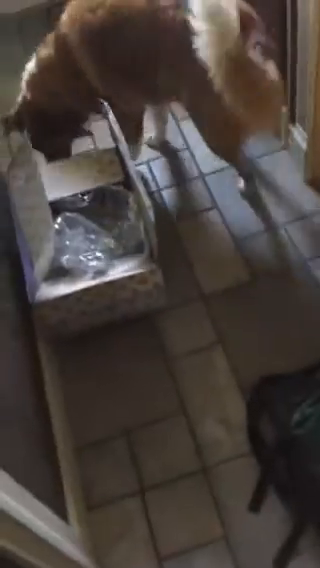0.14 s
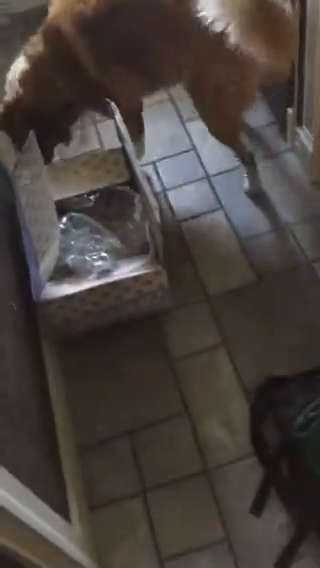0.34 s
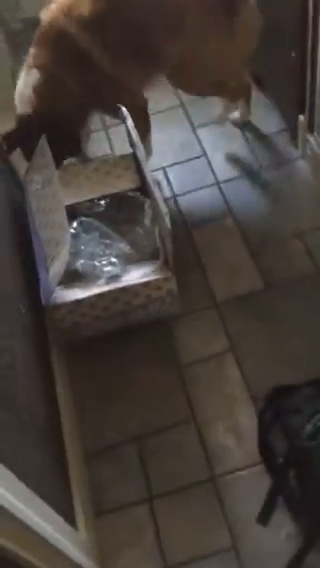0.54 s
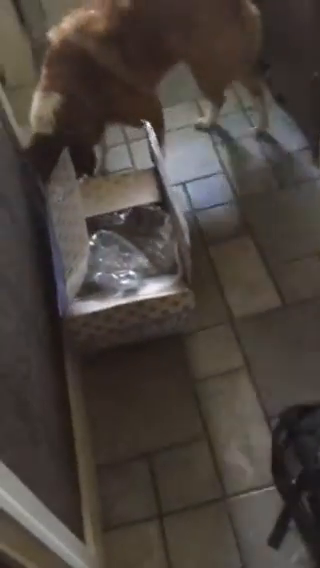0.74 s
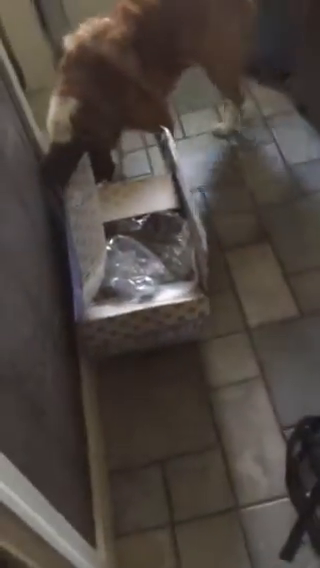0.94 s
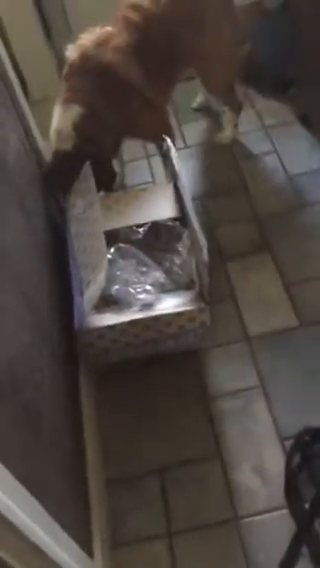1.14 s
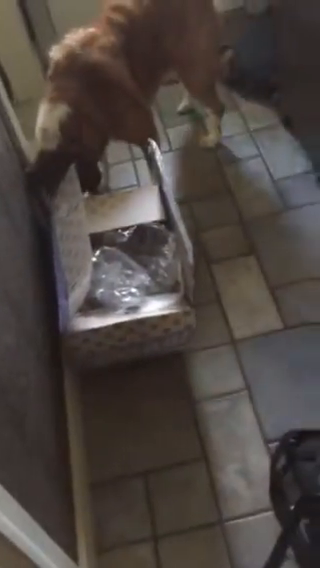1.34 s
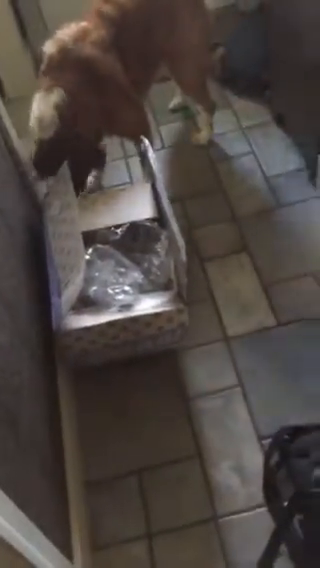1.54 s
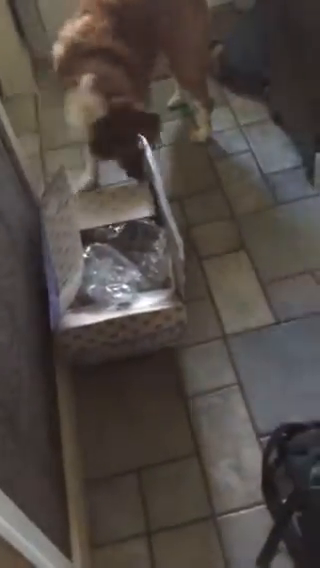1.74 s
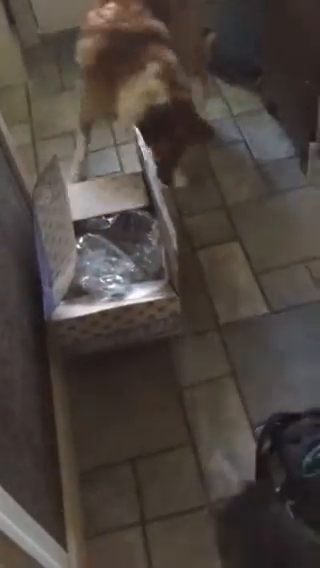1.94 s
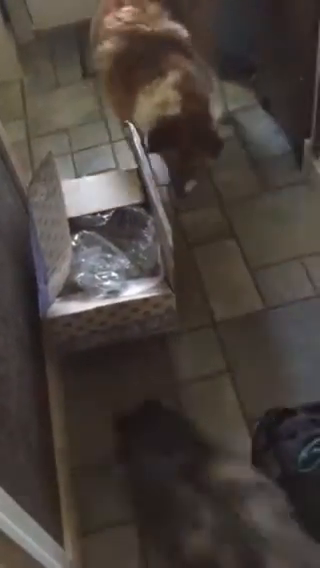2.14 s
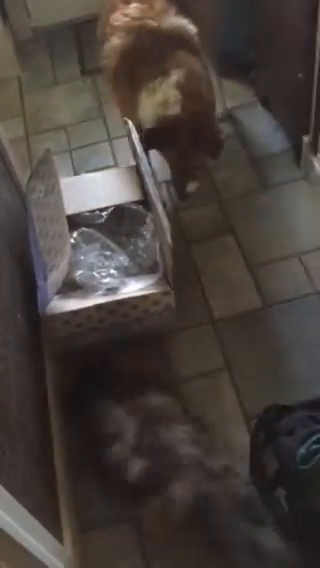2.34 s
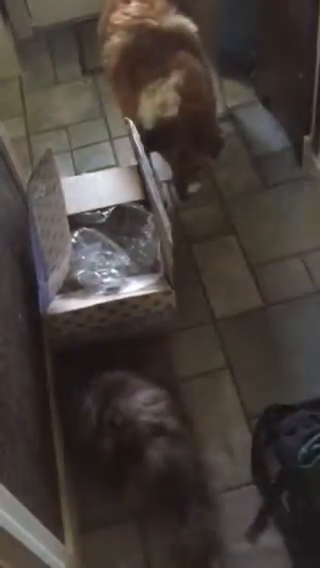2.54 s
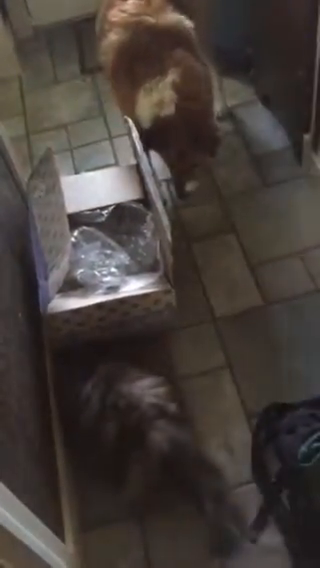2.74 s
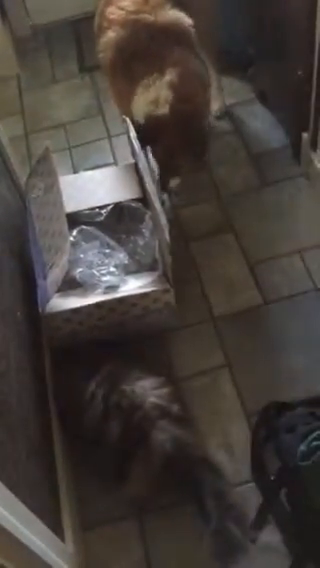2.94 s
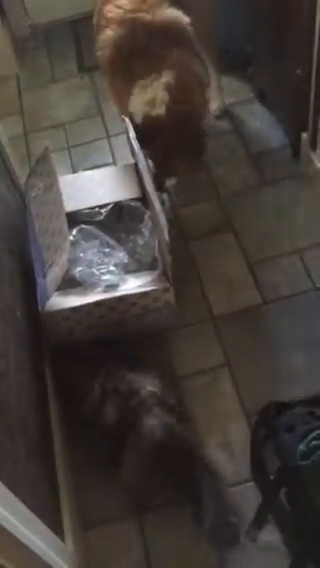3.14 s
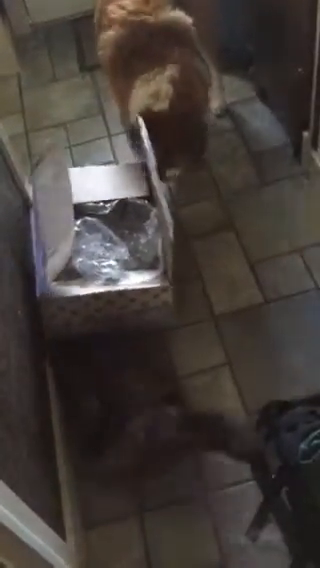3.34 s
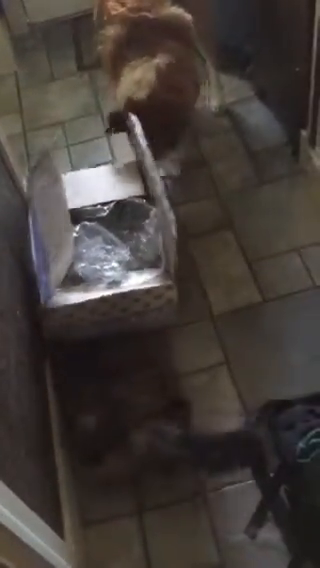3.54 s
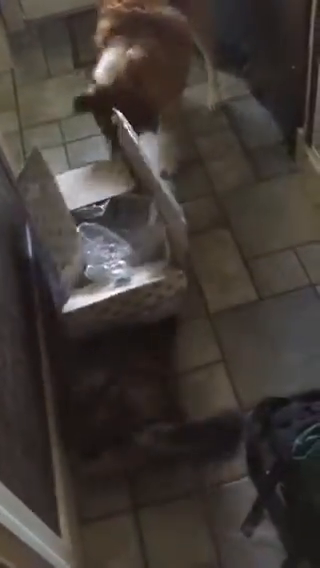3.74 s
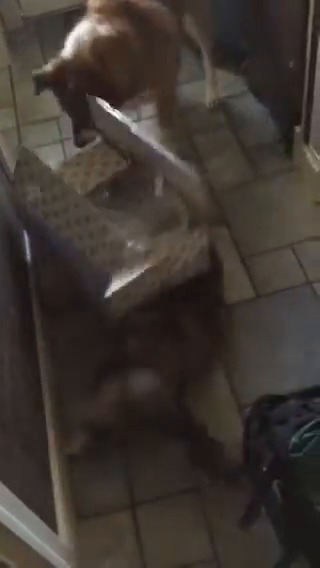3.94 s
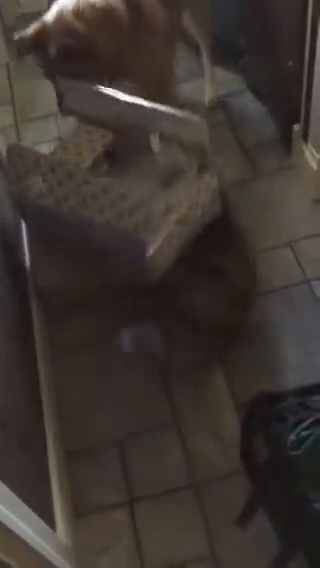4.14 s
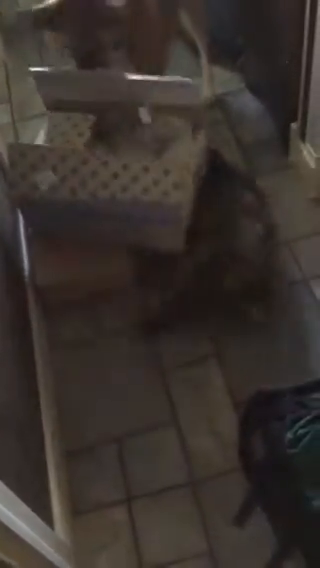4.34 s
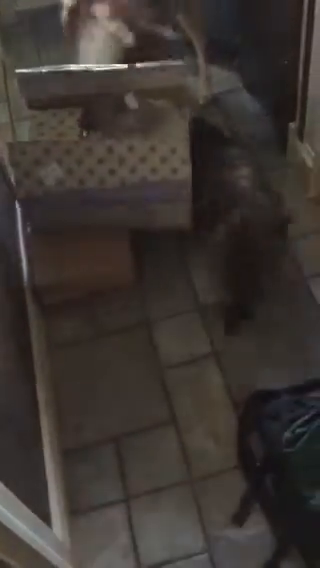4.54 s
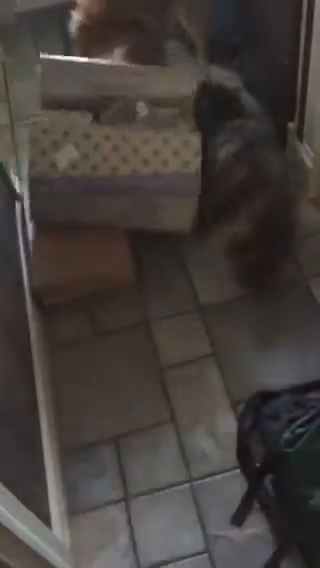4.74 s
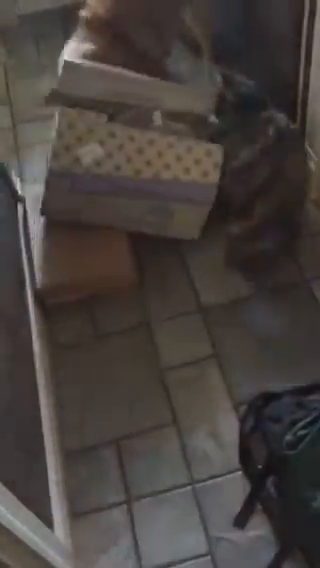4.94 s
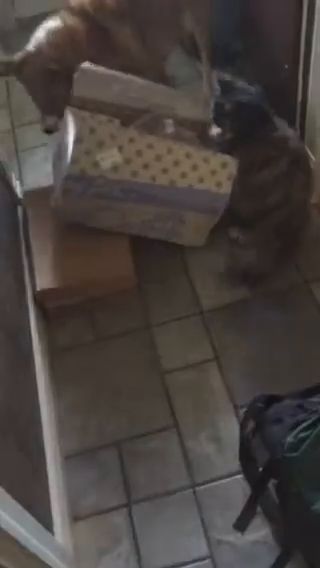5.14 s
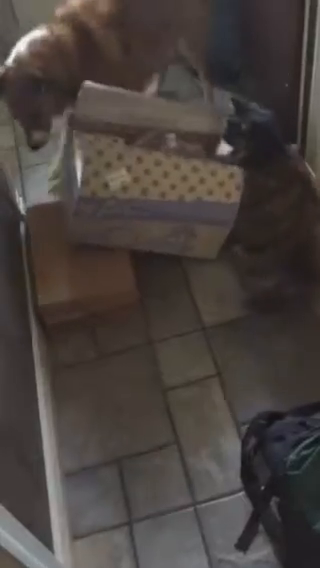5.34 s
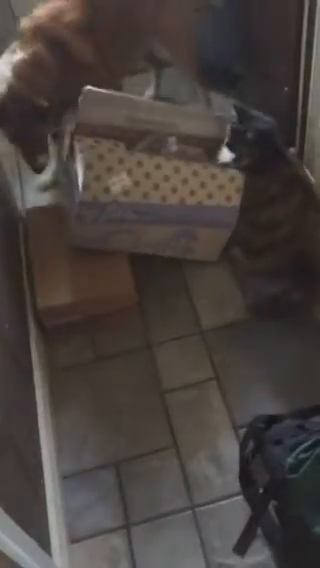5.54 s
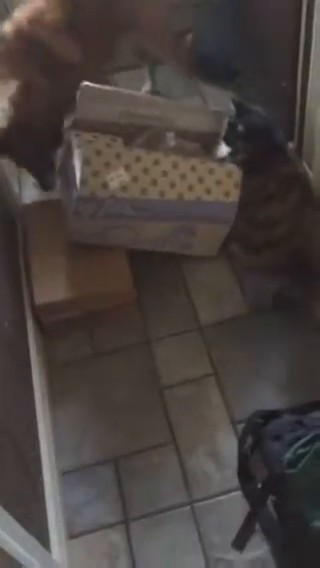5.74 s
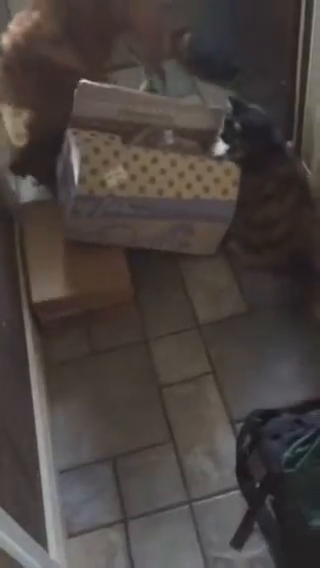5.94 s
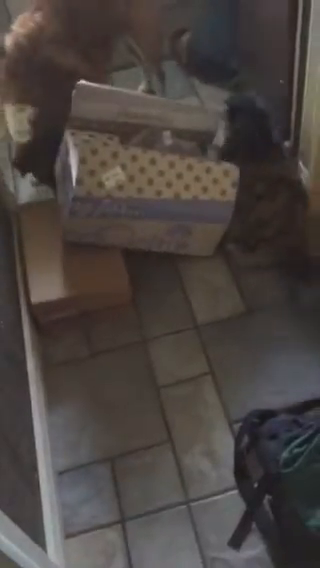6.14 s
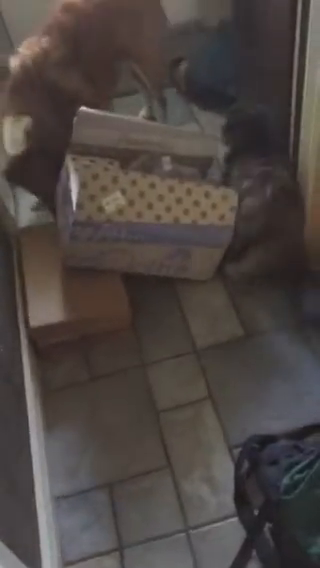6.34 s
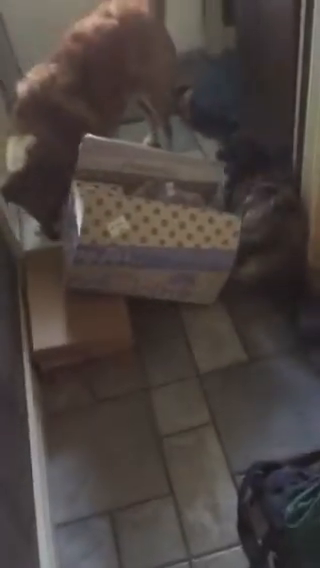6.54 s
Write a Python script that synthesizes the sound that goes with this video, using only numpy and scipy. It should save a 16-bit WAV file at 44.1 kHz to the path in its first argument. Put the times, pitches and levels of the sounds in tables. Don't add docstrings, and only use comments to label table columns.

```python
import sys
import numpy as np
from scipy import signal
from scipy.fft import rfft, irfft
from scipy.io import wavfile
from scipy.ndimage import uniform_filter1d

SR = 44100
rng = np.random.default_rng(int(sys.argv[2]) if len(sys.argv) > 2 else 0)


def boost_factor(decibels):
    exponent = np.asarray(decibels, float) / 20
    return 10 ** exponent


def store_pcm(level_fs):
    pcm = np.round(np.clip(level_fs, -1, 1) * 32767).astype(np.int16)
    wavfile.write(sys.argv[1], SR, np.atleast_2d(pcm).T)


N = 291035


def band(x, hz, width_hz):
    return signal.lfilter(*signal.iirpeak(hz, hz / width_hz, fs=SR), x)


def body(x, peaks):
    return sum((-1) ** k * boost_factor(db) * band(x, hz, width_hz) for k, (hz, width_hz, db) in enumerate(peaks))


def scaled(x, peak=False):
    return x / (np.abs(x).max() if peak else np.sqrt(np.mean(x ** 2)))


def steep(x, hz, width_hz):
    return scaled(band(band(x, hz, width_hz), hz, width_hz), peak=True)


def highpass(x, hz):
    return signal.sosfilt(signal.butter(2, hz, "high", fs=SR, output="sos"), x)


def add(out, x, start_s):
    i = max(int(start_s * SR), 0)
    out[i:i + len(x)] += x[:N - i]


def walk(rate_hz):
    hold = int(SR / rate_hz)
    steps = np.repeat(rng.standard_normal(N // hold + 1), hold)
    return scaled(uniform_filter1d(uniform_filter1d(steps, hold), hold)[:N])


def ring(t, hz, t60_s):
    return np.sin(2 * np.pi * hz * t) * 1000. ** (-t / t60_s)


def grains(size, rate_hz, scatter_db):
    when, size_draw, side = rng.random((3, size))
    strength = boost_factor(-scatter_db * np.log(size_draw + 0.003))
    return (when < rate_hz / SR) * strength * np.sign(side - .5)


def crumble(t, length_s, rate_hz):
    force = grains(len(t), rate_hz, 3.12) * np.exp(-t / length_s) * np.minimum(t / 0.0014, 1)
    force[SR // 1000] = 2.
    return force


# hz [Hz], level_db [dB per Hz]
AIR_SPECTRUM = [(12, -54), (20, -51), (37, -9.5), (76, -8.5), (112, -2), (133, -10), (153, -13.5),
                (282, -15.5), (404, -20), (452, -28.5), (491, -26), (767, -27.5), (906, -28.5), (1920, -32),
                (15500, -49)]
# hz [Hz], level_db [dB]
FRIDGE_HUM = [(119, -65.5), (280, -81), (356, -80), (1217, -85.5)]


def air():
    hz, db = np.transpose(AIR_SPECTRUM)
    f = np.maximum(np.arange(N // 2 + 1) * SR / N, 1)
    colour = rfft(rng.standard_normal(N)) * boost_factor(np.interp(np.log(f), np.log(hz), db))
    low, whole = irfft(colour * (f < 450), N), irfft(colour, N)
    rumble = boost_factor(-1 + 2.62 * walk(3.25)) * low
    hiss = boost_factor(2 + 0.64 * walk(1.2)) * (whole - low)
    drift_s = np.cumsum(1 + .008 * walk(2)) / SR
    hum = sum(boost_factor(level_db + 2.0 + 2.35 * walk(9.9)) * np.sin(2 * np.pi * partial_hz * drift_s)
              for partial_hz, level_db in FRIDGE_HUM)
    return boost_factor(-60.5) * scaled(rumble + hiss) + hum


# hz [Hz], t60_s [s]
ROOM_DECAY = [(200, 0.84), (1000, 0.3), (4000, 0.14), (12000, 0.18)]


def room(x):
    early_s, late_db = 0.028, 0.5
    t = np.arange(SR // 2) / SR
    echo = 0
    for hz, t60_s in ROOM_DECAY:
        noise = scaled(band(rng.standard_normal(len(t)), hz, 1.8 * hz))
        echo = echo + noise * np.sqrt(hz / t60_s) * 1000. ** (-t / t60_s)
    onset = np.clip(t / 0.00058 - .5, 0, 1)
    late = boost_factor(late_db * np.clip((t - early_s) / 0.0046, 0, 1))
    echo = echo * onset * late
    return signal.fftconvolve(x, echo / np.sqrt(np.sum(echo ** 2)))[:N]


# start_s [s], peak_db [dB]
TAG_CHINKS = [
    (0.018, -57),
    (2.095, -62),
    (2.583, -62.5),
    (2.612, -65),
    (3.576, -59),
    (3.605, -53),
    (5.9293, -55.5),
]
# hz [Hz], level_db [dB], t60_s [s]
TAG_MODES = [(9830, 0, 0.018), (10340, 6.5, 0.029), (11300, -7, 0.019), (8400, -6, .02), (6060, -4, 0.02),
             (6500, 0, 0.026), (14000, -6, 0.022)]


def tags():
    out, t = np.zeros(N), np.arange(SR // 5) / SR
    modes = sum(boost_factor(level_db) * ring(t, hz, t60_s) for hz, level_db, t60_s in TAG_MODES)
    for start_s, peak_db in TAG_CHINKS:
        chink = signal.fftconvolve(crumble(t, 0.019, 820), modes)[:len(t)]
        add(out, boost_factor(peak_db) * scaled(chink, peak=True), start_s)
    return out


def contact(force, db, hz, tick_db, grit_db, grit_hz=8500):
    spread = np.clip(0.65 + 0.054 * (db + 51.5), .2, 1.5)
    claw = steep(force, hz, 0.9 * hz) + spread * steep(force, 2400, 4500)
    tick = boost_factor(tick_db) * steep(force, 5870, 5400)
    grit = boost_factor(grit_db) * scaled(highpass(force, grit_hz), peak=True)
    return boost_factor(db) * (claw + tick + grit)


def tap(out, start_s, peak_db, ring_hz, tick_db, grit_db, grit_hz, crumble_s):
    length_s = crumble_s * np.exp(-0.0144 * (peak_db + 41.5))
    force = crumble(np.arange(SR // 4) / SR, length_s, 12000)
    add(out, boost_factor(-7.5) * contact(force, peak_db, ring_hz, tick_db, grit_db, grit_hz), start_s - .001)


def scuffs(rows, hz, grit_db):
    out, t = np.zeros(N), np.arange(SR // 4) / SR
    for start_s, peak_db, bright_db, slide_s in rows:
        swell = np.sin(np.pi * np.minimum(t / slide_s, 1) ** 0.76) ** 2
        force = grains(len(t), 14000, 1.46) * swell
        add(out, boost_factor(-4.5) * contact(force, peak_db, hz, bright_db, bright_db + grit_db), start_s - .004)
    return out


# start_s [s], peak_db [dB], ring_hz [Hz], tick_db [dB]
CLAW_TAPS = [(0.0428, -53.5, 2050, -21), (0.1071, -40, 3450, 5), (0.4972, -50.5, 2880, -21),
             (0.5608, -58, 1950, 7.5), (0.841, -49, 2240, 9.5), (1.1617, -48.5, 2100, -7),
             (1.372, -49.5, 1660, -29), (1.914, -33, 3800, -5), (2.0217, -49.5, 4040, -6),
             (2.055, -48, 2150, 4), (3.417, -45.5, 2360, -7), (3.7409, -44.5, 1940, -1),
             (4.2727, -49.5, 1770, -8), (4.4548, -29, 1420, 0.5), (4.5808, -38, 2200, 4),
             (4.8285, -42, 2060, -19), (4.8954, -37.5, 2150, 8.5), (5.009, -46, 1670, -7),
             (5.2744, -44, 2040, -12), (5.3081, -33.5, 2720, -12), (5.9965, -53, 2880, 0)]


def claw_taps():
    out = np.zeros(N)
    for start_s, peak_db, ring_hz, tick_db in CLAW_TAPS:
        tap(out, start_s, peak_db, ring_hz, tick_db, grit_db=-21, grit_hz=8400, crumble_s=0.016)
    return out


# start_s [s], peak_db [dB], bright_db [dB], slide_s [s]
PAW_SLIDES = [(0.0004, -52, 7, 0.012), (0.2694, -63, -3, 0.042), (0.3794, -66.5, 1, 0.048),
              (0.5044, -52.5, -14, 0.036), (0.8194, -45.5, -30, 0.066), (0.8994, -69, 3, 0.05),
              (1.3459, -59, -16, 0.019), (1.6594, -73, -2, 0.045), (1.7794, -55.5, -0.5, 0.038),
              (2.3085, -59.5, 3.5, 0.053), (2.489, -68.5, 8, 0.05), (2.5144, -71, 6, 0.051),
              (2.5844, -73, -4, 0.045), (5.7528, -57, -16, 0.037), (5.7709, -54, -21, 0.044),
              (5.8394, -70, 8, 0.03)]


def paw_scuffs():
    return scuffs(PAW_SLIDES, hz=2200, grit_db=-16)


# start_s [s], peak_db [dB], bright_db [dB], slide_s [s]
WRAP_BRUSHES = [
    (3.4734, -59.5, -12, 0.081),
    (4.19, -56.5, -15, 0.045),
    (4.219, -61, -6, 0.043),
    (5.1406, -68, -12, 0.027),
    (5.4994, -63, -8, 0.052),
]


def wrap_scuffs():
    return scuffs(WRAP_BRUSHES, hz=1560, grit_db=17.5)


# start_s [s], peak_db [dB], ring_hz [Hz], grit_db [dB]
TAPE_SNAPS = [
    (0.0191, -49.5, 1960, 11),
    (0.7771, -45, 2520, 10.5),
    (3.3273, -30, 1410, -0.5),
    (4.8754, -35.5, 1480, 4),
    (5.1679, -35.5, 1472, 16),
]


def tape_snaps():
    out = np.zeros(N)
    for start_s, peak_db, ring_hz, grit_db in TAPE_SNAPS:
        tap(out, start_s, peak_db, ring_hz, -39, grit_db, grit_hz=7900, crumble_s=0.015)
    return out


# start_s [s], peak_db [dB], ring_hz [Hz], grit_db [dB]
CARD_SKIDS = [
    (2.2308, -35, 2120, 7.5),
    (3.6052, -53.5, 1470, -2),
    (3.8781, -36.5, 1870, 12.5),
    (3.9575, -43, 1620, -9),
    (4.3896, -45.5, 2170, 12),
    (4.7579, -31, 1630, 4.5),
    (5.1231, -45, 2380, 15.5),
]


def card_skids():
    out = np.zeros(N)
    for start_s, peak_db, ring_hz, grit_db in CARD_SKIDS:
        tap(out, start_s, peak_db, ring_hz, 1.5, grit_db, grit_hz=3800, crumble_s=.018)
    return out


# start_s [s], peak_db [dB], bright_db [dB], slide_s [s]
BASE_SLIDES = [(3.2935, -45, -9, 0.15), (3.6297, -53, -12, 0.063), (3.67, -54, -7, 0.014),
               (3.8206, -52, -10, 0.058), (3.9803, -45.5, 2, 0.08), (4.0594, -57.5, 7, 0.1),
               (4.1087, -53.5, -2, 0.039), (4.6206, -46, -8, 0.014), (4.7886, -44, -6, 0.072),
               (4.9097, -44, -13, 0.056), (4.951, -45.5, -18, 0.054), (5.2106, -53, -8, 0.07),
               (5.2494, -42.5, 7, 0.049), (5.31, -44.5, -14, 0.05), (5.3574, -53.5, -12, 0.055),
               (5.411, -50, -8, 0.036)]


def box_scuffs():
    return scuffs(BASE_SLIDES, hz=1680, grit_db=-3)


# start_s [s], peak_db [dB], loudest_hz [Hz], rattle_s [s]
EDGE_BLOWS = [(0.111, -60.5, 686, 0.018), (1.915, -48.5, 1120, 0.01), (2.232, -58, 1170, 0.0073),
              (3.326, -31.5, 816, 0.022), (3.349, -36.5, 604, 0.012), (3.389, -46, 890, 0.026),
              (3.439, -45.5, 840, 0.0083), (3.519, -54, 610, 0.0072), (3.605, -52, 993, 0.022),
              (3.677, -47, 1070, 0.005), (3.882, -68, 960, 0.015), (3.989, -43, 1050, 0.021),
              (4.454, -23, 992, 0.0058), (4.575, -44.5, 1136, 0.046), (4.713, -45.5, 1080, 0.021),
              (4.76, -25, 877, 0.0097), (4.865, -33, 1050, 0.012), (4.958, -36.5, 486, 0.024),
              (5.124, -45, 690, 0.015), (5.169, -25.5, 930, 0.0077), (5.53, -55, 1050, 0.0097)]
# hz [Hz], width_hz [Hz], level_db [dB]
EDGE_MODES = [(604, 330, 4), (877, 430, 3.5), (1050, 52, -9), (1470, 200, -10.5)]


def knocks():
    out, t = np.zeros(N), np.arange(SR // 4) / SR
    for start_s, peak_db, hz, rattle_s in EDGE_BLOWS:
        force = band(crumble(t, rattle_s, 4000), 510, 1140)
        edge = scaled(body(force, EDGE_MODES), peak=True)
        add(out, boost_factor(peak_db - 6) * (steep(force, hz, 187) + 1.01 * edge), start_s)
    return out


# start_s [s], peak_db [dB], panel_hz [Hz], boom_db [dB]
PAW_LANDINGS = [(0.049, -49, 283, -13), (0.111, -33, 213, -17.5), (0.451, -50, 265, -8),
                (0.558, -57.5, 145, 6), (0.779, -43, 229, -18), (0.806, -55, 268, 2), (1.779, -65, 143, 10),
                (1.911, -43.5, 145, -19), (2.074, -48.5, 149, 1), (2.233, -30, 202.6, -17.5),
                (2.306, -44.5, 161, -7)]
# start_s [s], peak_db [dB], panel_hz [Hz], boom_db [dB]
BOX_DROPS = [(3.329, -22, 239.7, -41), (3.364, -19, 210.3, -22), (3.417, -28, 200, -17),
             (3.471, -31, 208.5, -23.5), (3.522, -41, 200, -17), (3.735, -40, 202, -20),
             (3.655, -36, 226, -24), (3.678, -31.5, 163, -28), (3.957, -42.5, 150, -15),
             (4.21, -44, 155, -4.5), (4.336, -42.5, 194, -7), (4.456, -19, 206.6, -33),
             (4.578, -28, 185.5, -15), (4.715, -29.5, 309, -14), (4.762, -20.5, 324.6, -11),
             (4.811, -27.5, 296, -7.5), (4.862, -17, 192, -20), (4.958, -26.5, 179.5, -16),
             (4.998, -31.5, 211, -13), (5.12, -19.5, 164.3, -13), (5.171, -19.5, 193.2, -17),
             (5.231, -38.5, 166, -16), (5.326, -54, 217, 5), (5.423, -43, 209, -5), (5.539, -50, 181, -0.5)]
# hz [Hz], level_db [dB]
PANEL_MODES = [(165, 5.5), (200, 5.5), (250, 2.5), (278, 1), (312, 2), (382, 3), (470, -8)]
# hz [Hz], level_db [dB], t60_s [s]
FLOOR_MODES = [(56, -4.5, 0.18), (72, 9, 0.096), (89, -2.5, 0.23)]


def thumps():
    free_ring_s, t60_s = 0.0457, 0.41
    out, t = np.zeros(N), np.arange(SR // 2) / SR
    slab = sum(boost_factor(level_db) * ring(t, hz, slab_t60_s) for hz, level_db, slab_t60_s in FLOOR_MODES)
    boom = scaled(slab * (1 - np.exp(-t / 0.023)), peak=True)
    choke = 0.24 + 0.65 * np.exp(-np.maximum(t - free_ring_s, 0) / 0.0039)
    for start_s, peak_db, panel_hz, boom_db in PAW_LANDINGS + BOX_DROPS:
        near = 0
        for hz, level_db in PANEL_MODES:
            detune = 1 + 0.024 * rng.standard_normal()
            gain = boost_factor(level_db - 4.5 * abs(np.log2(hz / panel_hz)))
            near = near + gain * ring(t, hz * detune, 0.76 * t60_s)
        panel = (1 - np.exp(-t / 0.0017)) * (ring(t, panel_hz, t60_s) + .5 * near)
        thump = scaled(panel, peak=True) * choke + boost_factor(boom_db + 5.5) * boom
        add(out, boost_factor(peak_db - 4) * thump, start_s - .002)
    return out


def patchy(peaks, rate_hz, jerk_db):
    slips = grains(N, rate_hz, 2.5)
    return scaled(sum(boost_factor(db + jerk_db * walk(24.927)) * band(slips, hz, width_hz) for hz, width_hz, db in peaks))


# full_s [s], rasp_db [dB], build_s [s], slacken_s [s], wrap_db [dB against the rasp]
BOX_PULLS = [(3.32, -67.5, 0.28, .03, -14), (3.35, -55, 0.011, 0.11, -23), (3.5, -73, 0.23, 0.11, 7),
             (3.7, -63, 0.4, 0.9, -3.5), (3.88, -58.5, 0.18, 0.51, -6), (4.06, -63.5, 0.73, 0.38, 0.5),
             (4.45, -57, 0.16, 0.13, -5), (4.63, -54, 0.13, 0.074, -13), (4.764, -44.5, 0.025, .2, -16),
             (4.9, -48, 0.17, 0.17, -4), (5.122, -50.5, 0.008, 0.17, -8), (5.175, -52, .03, 0.31, 0),
             (5.32, -49, 0.38, 0.23, -2), (5.5, -64, 0.17, 0.07, -0.5)]
# hz [Hz], width_hz [Hz], level_db [dB]
RASP_MODES = [(900, 340, 6.5), (1700, 1200, -3), (2480, 3900, -9.5)]
# hz [Hz], width_hz [Hz], level_db [dB]
WRAP_MODES = [(5370, 1000, 3), (7200, 5000, 8.5), (9400, 3800, -10), (12900, 4300, -8)]


def drag():
    rumble_db, rumble_lag_s = -4, 0.023
    t, rasp, wrap = np.arange(N) / SR, np.zeros(N), np.zeros(N)
    for full_s, rasp_db, build_s, slacken_s, wrap_db in BOX_PULLS:
        pull = boost_factor(rasp_db - 20 * np.where(t < full_s, (full_s - t) / build_s, (t - full_s) / slacken_s))
        rasp = np.maximum(rasp, pull)
        wrap = np.maximum(wrap, boost_factor(wrap_db) * pull)
    keep = np.exp(-1 / (rumble_lag_s * SR))
    shake = boost_factor(rumble_db) * signal.lfilter([1 - keep], [1, -keep], rasp)
    rumble = scaled(body(grains(N, 400, 5.2), [(hz, 40, db) for hz, db in PANEL_MODES]))
    scrape = boost_factor(-3.0) * rasp * patchy(RASP_MODES, 3000, 3.35)
    crackle = boost_factor(-3.5) * wrap * patchy(WRAP_MODES, 1500, 6.1)
    return scrape + shake * rumble + crackle


def scene():
    taps = claw_taps() + card_skids() + tape_snaps()
    slides = paw_scuffs() + box_scuffs() + wrap_scuffs()
    sharp = taps + slides + knocks() + tags() + drag()
    low = thumps()
    wet = room(sharp + .25 * low)
    return (1.42 * sharp + low + boost_factor(-2.5) * wet + air())[None]


def band_limit(x):
    return signal.sosfilt(signal.butter(12, 15780, fs=SR, output="sos"), x)


# hz [Hz], width_hz [Hz], depth [0-1]
PORT_DIPS = [(4930, 210, 0.7), (7620, 170, 1), (10300, 200, 0.34)]


def record(dry):
    bottom_hz, top_hz = 32.3, 15350
    for hz, width_hz, depth in PORT_DIPS:
        dry = dry - depth * band(dry, hz, width_hz)
    dry = highpass(dry, bottom_hz)
    dry = signal.sosfilt(signal.ellip(10, .2, 70, top_hz, fs=SR, output="sos"), dry)
    return band_limit(dry)


dry = scene()
out = record(dry)
store_pcm(out)
```